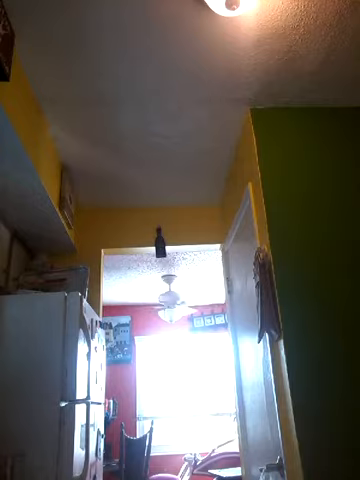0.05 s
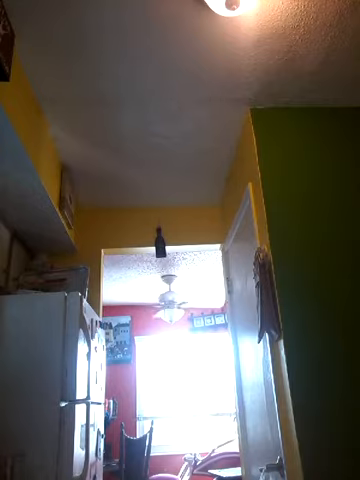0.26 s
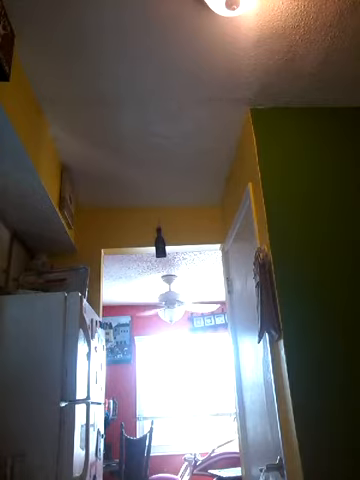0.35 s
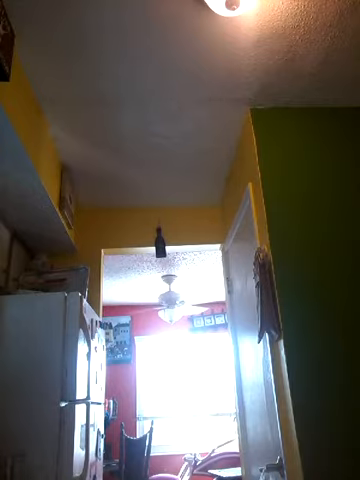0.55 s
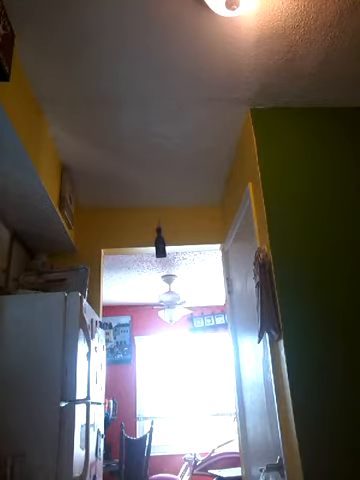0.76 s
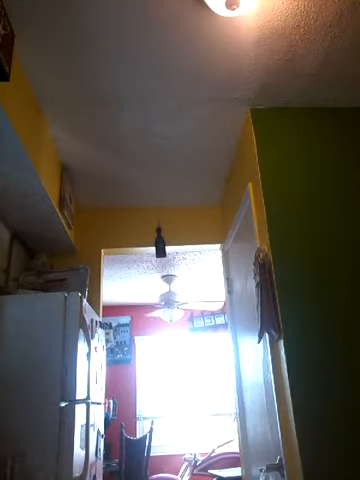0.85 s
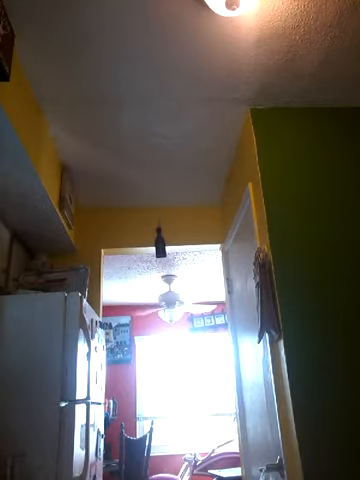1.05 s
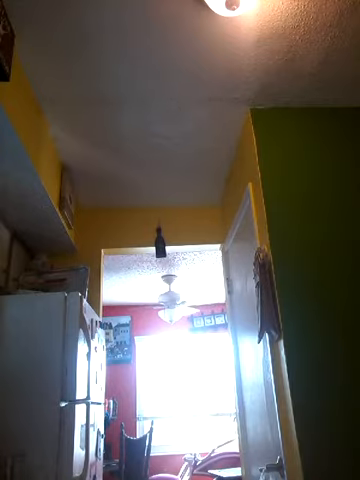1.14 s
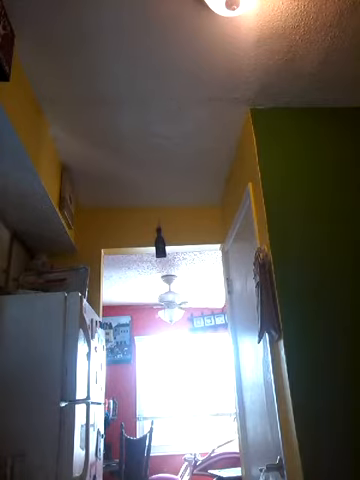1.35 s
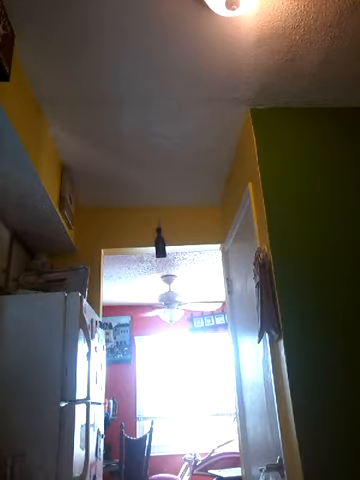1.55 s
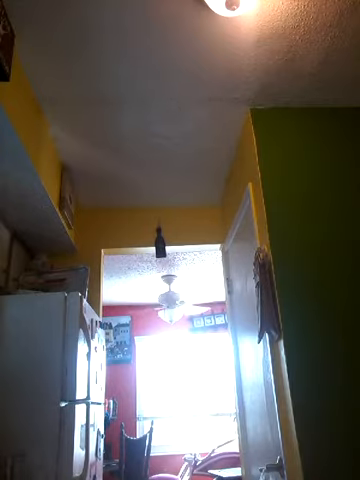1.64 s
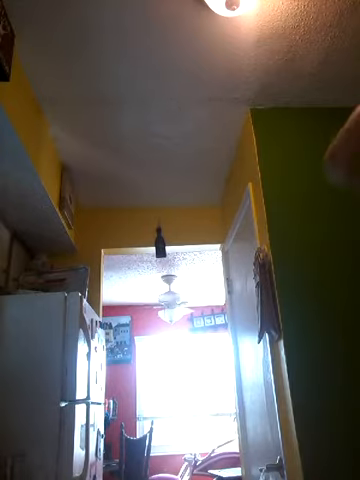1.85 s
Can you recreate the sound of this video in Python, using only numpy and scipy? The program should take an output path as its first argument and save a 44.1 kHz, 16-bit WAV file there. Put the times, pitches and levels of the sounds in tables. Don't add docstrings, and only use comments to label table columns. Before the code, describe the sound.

Kitchen drawer rummaging: hollow wooden thumps, rattling cutlery, a short slide and a hard closing knock.

```python
import sys
import numpy as np
from scipy import signal
from scipy.fft import rfft, irfft
from scipy.io import wavfile
from scipy.ndimage import uniform_filter1d

SR = 44100
rng = np.random.default_rng(int(sys.argv[2]) if len(sys.argv) > 2 else 0)


def output_pcm(signal):
    pcm = np.clip(np.atleast_2d(signal).T, -1, 1) * 32767
    wavfile.write(sys.argv[1], SR, np.round(pcm).astype(np.int16))


def ratio(d):
    e = np.asarray(d, float) / 20
    return 10 ** e


N = 83790


def evened(x):
    return x / np.sqrt(np.mean(x ** 2) + 1e-20)


def read(points, hz):
    f, value = np.transpose(points)
    return np.interp(np.log(hz + 1), np.log(f + 1), value)


def add(mix, s, sound):
    part = mix[round(s * SR):][:len(sound)]
    part += sound[:len(part)]


def colour(x, points, tilt_db=0.):
    hz = np.fft.rfftfreq(x.shape[-1], 1 / SR)
    gain_db = read(points, hz) + tilt_db * np.log2((hz + 300) / 1800)
    return irfft(rfft(x) * ratio(gain_db), x.shape[-1])


def ring(modes, t, shift):
    return sum(ratio(db - 60 * t / t60) * np.sin(2 * np.pi * hz * k * t)
               for (hz, db, t60), k in zip(modes, shift))


def clicks(count, per_s, spread_db):
    chance, size, sign = rng.random((count, 3)).T
    return (chance < per_s / SR) * ratio(-spread_db * np.log(size + 0.0021)) * np.sign(sign - .5)


def pair(a, b):
    # columns f/Hz, likeness/0-1
    likeness = [(100, 1), (250, 1), (500, 0.51), (1000, 0.013), (8000, 0.0071)]
    hz = np.fft.rfftfreq(len(a), 1 / SR)
    same = np.clip(read(likeness, hz), 0, 1)
    mid = np.sqrt((1 + same) / 2) * rfft(a)
    side = np.sqrt((1 - same) / 2) * rfft(b)
    return irfft(np.array([mid + side, mid - side]), len(a))


def swell(t, push_s):
    return np.sin(np.pi / 2 * np.clip(t / push_s, 0, 1)) ** 2


def thumps():
    # columns t/s, panel level/dB, cavity level/dB, panel ring/s
    pushes = [(.004, -48, -51, 0.44), (0.042, -37.5, -45.5, 0.31), (0.072, -25, -37, 0.12),
              (0.129, -39, -50, 0.19), (0.178, -37.5, -47, 0.14), (0.22, -25, -61, 0.45),
              (0.231, -15.5, -42, 0.072), (0.262, -26.5, -33, 0.25), (0.289, -30.5, -34.5, 0.34),
              (0.342, -24, -76, 0.3), (0.377, -20, -23, 0.32), (0.395, -4.5, -25, 0.089),
              (0.425, -16.5, -26.5, 0.16), (0.45, -21, -26, 0.37), (0.467, -18.5, -25.5, 0.17),
              (0.499, -13, -28, 0.1), (.512, -32.5, -36, 0.11), (0.54, -33.5, -34, 0.24),
              (0.605, -27, -43, 0.082), (0.648, -17, -39, 0.18), (0.673, -35.5, -49, 0.21),
              (0.695, -18, -28.5, 0.24), (0.712, -16, -33.5, 0.1), (0.731, -11.5, -43, 0.11),
              (0.761, -23, -37, 0.21), (0.797, -25.5, -34, 0.3), (0.885, -20.5, -29.5, 0.12),
              (0.942, -34, -37, 0.19), (1.249, -19, -31, 0.053), (1.259, -12.5, -32.5, 0.039),
              (1.274, -44, -38, 0.16), (1.504, -47.5, -59, 0.083)]
    # columns f/Hz, level/dB
    panel_modes = [(317.3, 1.5), (265.2, -8.5), (341, -19), (415.3, -10.5), (495.6, -9), (559, -15.5)]
    # columns f/Hz, level/dB
    cavity_modes = [(178.7, 8.5), (129, -13.5), (220.3, 2)]
    push_s, detune = 0.00605, 0.017
    cavity_ring_s, cavity_gain_db = 0.098, 1.5
    out, t = np.zeros((2, N)), np.arange(12000) / SR
    draws = rng.standard_normal((len(pushes), 15))
    gaps = np.diff([row[0] for row in pushes] + [N / SR])
    cavity = [(f, d, cavity_ring_s) for f, d in cavity_modes]
    for (s, db, cavity_db, ring_s), k, gap in zip(pushes, draws, gaps):
        panel = [(f, d + 4 * g * (d < 0), ring_s * 320 / f) for (f, d), g in zip(panel_modes, k[9:])]
        body = ratio(db) * ring(panel, t, 1 + detune * k) * (1 - swell(t - gap, push_s))
        hollow = ratio(cavity_db + cavity_gain_db) * ring(cavity, t, 1 + 2 * detune * k[6:])
        add(out[0], s - push_s / 2, body * swell(t, push_s))
        add(out[1], s - push_s / 2, hollow * swell(t, push_s))
    return out


def clacks():
    # columns t/s, level/dB, tilt/dB per octave, rattle/s, rise/s
    clusters = [(0.003, -38, -6, .15, .002), (.045, -36.5, -1.5, 0.052, 0.011),
                (0.064, -25, -7, 0.033, 0.0061), (0.17, -40, 4, 0.036, 0.0086),
                (0.195, -30.5, 0.5, 0.076, 0.013), (0.221, -13, 4.5, 0.16, 0.0043),
                (0.299, -25.5, 3, 0.2, 0.0038), (0.35, -24.5, 3, 0.27, 0.0038),
                (0.384, -25.5, 7, 0.034, 0.0051), (0.402, -16, -3, 0.024, 0.0064),
                (0.451, -14, -3.5, 0.033, 0.003), (.468, -22, -5, 0.022, 0.0028),
                (0.503, -24, -7, 0.025, 0.0041), (0.645, -8.5, -1.5, 0.029, 0.0089),
                (0.655, -10, -2.5, 0.069, 0.005), (0.677, -17.5, -0.5, 0.027, 0.0015),
                (0.699, -22.5, 6.5, 0.079, 0.0074), (0.736, -20, 7.5, 0.055, 0.0029),
                (.746, -13.5, -4.5, 0.016, 0.004), (0.781, -22, 8.5, 0.052, 0.0093),
                (0.886, -16.5, -3, 0.035, 0.0055), (0.905, -25, 6, 0.05, 0.0024),
                (0.972, -18, -4.5, 0.032, 0.0062), (1.005, -31, 9.5, 0.05, 0.017),
                (1.205, -19.5, 3.5, 0.11, 0.014), (1.251, -9.5, 2.5, 0.021, 0.0019),
                (1.255, -13, 1.5, 0.0077, 0.0014), (1.26, -16, -0.5, 0.013, 0.001),
                (1.278, -23, 0.5, 0.041, .002), (1.302, -30, 4.5, 0.022, 0.0015),
                (1.318, -37, -8, 0.025, 0.0016), (1.501, -40, 3, 0.023, 0.0029)]
    # columns f/Hz, level/dB
    crack_colour = [(250, -19.5), (500, -11), (1200, -9), (2400, -19), (5450, -25.5), (8000, -35.5),
                    (10500, -36.5), (15900, -47.5)]
    # columns f/Hz, level/dB
    utensil_modes = [(650, -14), (770, -6), (980, 5), (1190, 16), (1320, -8), (1540, -7), (1890, -37),
                     (2120, -5), (2570, 24), (3370, 11.5), (5500, -50), (10500, -38)]
    clicks_per_s, click_spread_db = 5000, 2
    ring_s, ring_detune, ring_db = 0.01, 0.065, -15
    even_hz, lead = 250, 200
    out, t = np.zeros(N), np.arange(16384) / SR
    for s, db, tilt_db, rattle_s, rise_s in clusters:
        shape = np.minimum(t / rise_s, 1) * ratio(-60 * np.maximum(t - rise_s, 0) / rattle_s)
        cluster = np.roll(clicks(len(t), clicks_per_s, click_spread_db) * shape, lead)
        z = rfft(cluster)
        power = uniform_filter1d(abs(z) ** 2, size=round(even_hz * len(t) / SR))
        cluster = irfft(z / np.sqrt(power + 1e-12), len(t))
        g, k = rng.standard_normal((len(utensil_modes), 2)).T
        struck = [(f, d + 5 * c, ring_s) for (f, d), c in zip(utensil_modes, g)]
        modes = colour(ring(struck, t, 1 + ring_detune * k), [(1, 0), (2, 0)], tilt_db)
        crack = colour(cluster, crack_colour, tilt_db)
        rung = signal.fftconvolve(cluster, modes)[:len(t)]
        both = crack / np.linalg.norm(crack) + ratio(ring_db) * rung / np.linalg.norm(rung)
        add(out, s - lead / SR - .002, ratio(db) * 6 * both / np.linalg.norm(both))
    return out


def knocks():
    # columns t/s, level/dB, f/Hz, ring/s
    pitched = [(0.32, -41, 900, 0.07), (.245, -24.5, 1011, 0.095), (0.455, -17, 1383, 0.025),
               (0.507, -28.5, 921, 0.13), (.886, -21.5, 721, 0.076), (.966, -19.5, 219, 0.053),
               (.974, -27.5, 744, 0.065), (1.003, -26, 560, 0.068), (1.071, -22, 487, 0.04),
               (1.108, -29, 456, 0.09), (1.251, -14.5, 403, 0.04), (1.259, -12, 392, 0.023),
               (1.256, -15, 1173, 0.045), (1.215, -25, 2500, 0.055), (.655, -19, 515, 0.063),
               (1.8, -55.5, 960, 0.17), (0.4, -27, 4300, 0.027), (0.453, -30.5, 2760, 0.042),
               (.652, -16, 1400, 0.044), (.658, -17, 3150, 0.027), (1.251, -29, 110.7, 0.11),
               (0.26, -32.5, 95, 0.078), (.65, -21, 195, 0.13), (.652, -20.5, 680, 0.067),
               (0.93, -37, 2080, 0.07), (.398, -19, 540, 0.045), (.415, -24.5, 820, .08),
               (.16, -42.5, 105, .15), (.93, -34.5, 108, 0.17), (.232, -35, 2110, 0.11),
               (.078, -39.5, 700, 0.13)]
    # t/s, level/dB, f/Hz, width/Hz, t60/s
    shimmer = (1.253, -46, 5450, 400, .45)
    out, t = np.zeros(N), np.arange(20000) / SR
    for s, db, hz, ring_s in pitched:
        tones = ring([(hz, db, ring_s), (hz, db - 15, ring_s)], t, [1, 1.05])
        add(out, s, tones * np.minimum(t / 0.0018, 1))
    s, db, hz, width, t60 = shimmer
    band = signal.butter(2, [hz - width / 2, hz + width / 2], "band", fs=SR, output="sos")
    fuzz = signal.sosfilt(band, rng.standard_normal(len(t)))
    add(out, s, ratio(db - 60 * t / t60) * evened(fuzz))
    return out


def ticks():
    # columns t/s, level/dB
    taps = [(.222, -22), (.228, -33), (0.234, -19.5), (.398, -31), (.453, -31), (0.457, -25), (.47, -24),
            (.508, -21), (.65, -22), (.656, -17), (.659, -19), (0.662, -15), (.678, -24), (0.679, -18),
            (0.693, -21), (0.739, -10.5), (0.745, -28), (.79, -34), (0.886, -30), (.973, -23), (1.008, -28),
            (1.224, -22), (1.25, -1), (1.256, -19), (1.26, -13), (1.262, -14), (1.271, -16), (1.28, -27),
            (1.286, -28), (1.318, -25.5)]
    # columns f/Hz, level/dB
    tap_colour = [(200, -16), (500, 0), (1200, 4), (2500, 1.5), (5500, -27), (8000, -34), (10500, -17),
                  (15900, -40)]
    tap_s = .001
    out, t = np.zeros(N), np.arange(400) / SR
    for s, db in taps:
        crack = rng.standard_normal(len(t)) * ratio(-60 * t / tap_s)
        add(out, s, ratio(db) * crack / np.linalg.norm(crack))
    return 5 * colour(out, tap_colour)


def slide():
    # columns t/s, level/dB, brightness (-3 or less all dull, 3 or more all bright)
    course = [
        (0.92, -51, -15),
        (.95, -41, -6),
        (1.008, -33, -4),
        (1.049, -37.5, 0.5),
        (1.14, -38.5, -3),
        (1.164, -32, 6),
        (1.21, -27.5, 4),
        (1.243, -27, -1),
    ]
    # columns f/Hz, width/Hz, level/dB
    runner_modes = [(490, 60, 0), (810, 35, -1), (1110, 40, 0), (1450, 50, -6), (1850, 45, -4),
                    (2090, 45, -5)]
    # columns f/Hz, level/dB
    rub_colour = [(80, -25), (170, -4), (450, -0.5), (1100, 6.5), (2500, -3), (5500, -19.5), (8000, -23.5),
                  (10500, -27), (15900, -41)]
    slips_per_s, slip_spread_db = 2500, 2.5
    s, db, tilt_db = np.transpose(course)
    t = np.arange(N) / SR
    slips = clicks(N, slips_per_s, slip_spread_db)
    runner = [(f, d, np.log(1000) / np.pi / width) for f, width, d in runner_modes]
    modes = ring(runner, t[:8000], np.ones(len(runner)))
    dull = evened(colour(slips, rub_colour, 2.2)) + evened(signal.oaconvolve(slips, modes)[:N])
    bright = evened(colour(slips, rub_colour, 3))
    share = np.clip(.5 + np.interp(t, s, tilt_db) / 6, 0, 1)
    return ratio(np.interp(t, s, db, -120, -120)) * ((1 - share) * dull + share * bright)


def kitchen():
    # columns f/Hz, t60/s
    decay = [(125, 0.7), (400, 0.35), (1200, 0.32), (4000, 0.3), (12000, 0.17)]
    early_db, early_s = 7.5, 0.006
    echoes = np.zeros((2, 30000))
    at = np.arange(120, 29980, 20) + rng.integers(0, 20, (2, 1493))
    np.put_along_axis(echoes, at, rng.choice([-1., 1.], at.shape), 1)
    hz, t, z = signal.stft(echoes, SR, nperseg=512)
    fall_db = early_db * np.exp(-t / early_s) - 60 * t / read(decay, hz)[:, None]
    tail = signal.istft(z * ratio(fall_db), SR, nperseg=512)[1][:, :30000]
    return pair(*tail) / np.linalg.norm(tail[0])


def air():
    # columns f/Hz, level/dB
    air_colour = [(15, -37), (25, -22), (107, -3.5), (166, -11.5), (217, -6), (393, -18.5), (475, -15),
                  (589, -15.5), (15900, -38)]
    level_db, patch_db, swell_db = -57.5, 0.5, 3
    hz, t, z = signal.stft(rng.standard_normal((2, N)), SR, nperseg=1024)
    patches = uniform_filter1d(rng.standard_normal(z.shape[1:]), 3, 0)
    patches = evened(uniform_filter1d(patches, 5, 1))
    drift = evened(uniform_filter1d(rng.standard_normal(len(t)), size=9)) / (1 + hz[:, None] / 400)
    x = signal.istft(z * ratio(patch_db * patches + swell_db * drift), SR, nperseg=1024)[1][:, :N]
    return ratio(level_db) * evened(pair(*colour(x, air_colour)))


def scene():
    low, hollow = thumps()
    tones = knocks()
    high = clacks() + slide() + ticks()
    send = ratio(-15) * (low + hollow) + ratio(-8) * tones + ratio(-1) * high
    turn = np.arange(N) / SR / .03
    wet = np.zeros((2, N))
    for k in range(6):
        gate = np.cos(np.pi / 2 * np.clip((turn + k) % 6 - 3, -1, 1))
        wet += signal.fftconvolve((send * gate)[None], kitchen(), axes=1)[:, :N]
    near = low + tones + ratio(-3) * high
    direct = np.array([near, np.roll(near, -10)]) + hollow
    low_cut = signal.butter(3, 100, "high", fs=SR, output="sos")
    return signal.sosfilt(low_cut, direct + wet) + air()


def low_pass(x):
    return signal.sosfilt(signal.butter(12, 16120, fs=SR, output="sos"), x)


def record(dry):
    # columns f/Hz, level difference/dB
    port_tilt = [(150, -0.5), (300, -0.5), (550, -8), (1500, 3.5), (4500, -2), (8000, 0.5), (10500, -10),
                 (14000, -2.5)]
    hz = np.fft.rfftfreq(N, 1 / SR)
    port_db = np.array([[.5], [-.5]]) * read(port_tilt, hz)
    ports = irfft(rfft(dry) * ratio(port_db), N)
    return low_pass(ports)


dry = scene()
out = record(dry)
output_pcm(out)
```